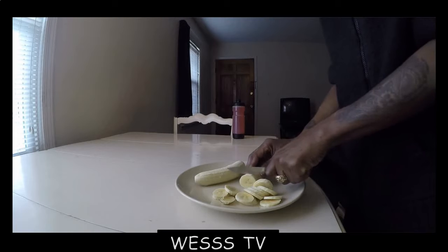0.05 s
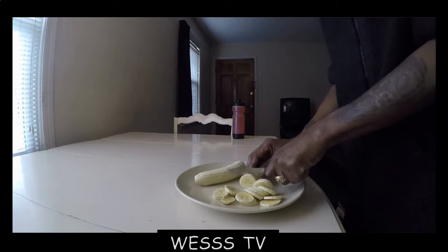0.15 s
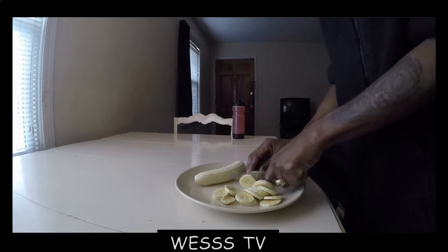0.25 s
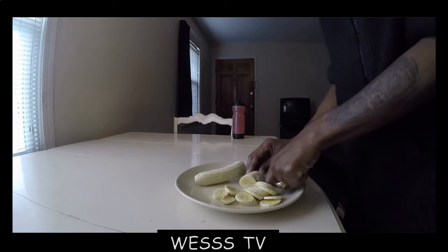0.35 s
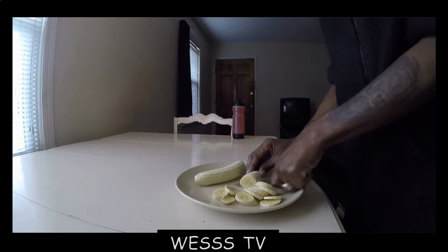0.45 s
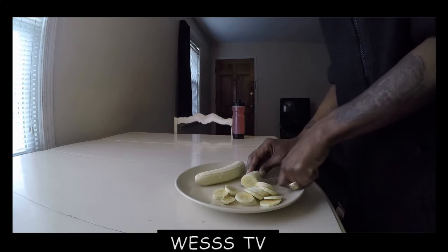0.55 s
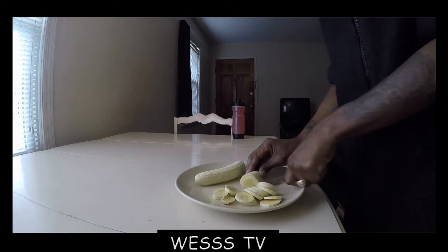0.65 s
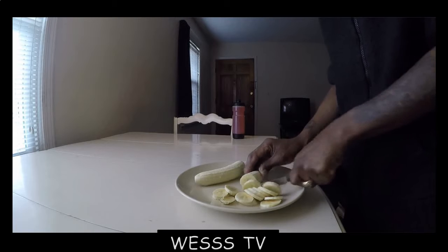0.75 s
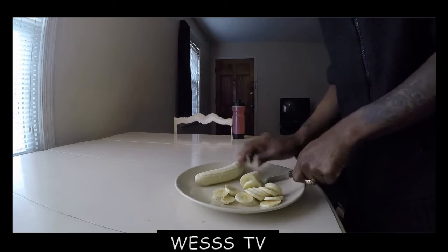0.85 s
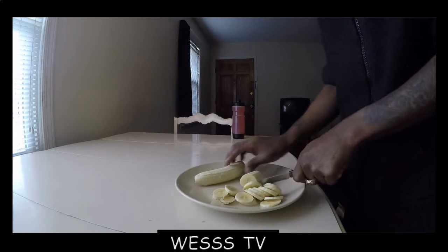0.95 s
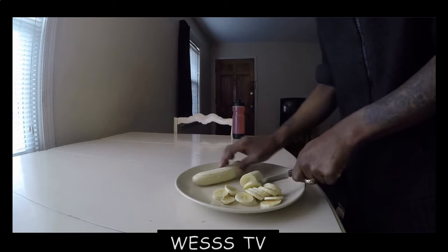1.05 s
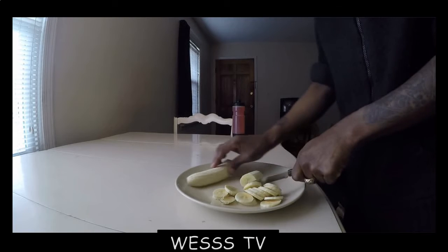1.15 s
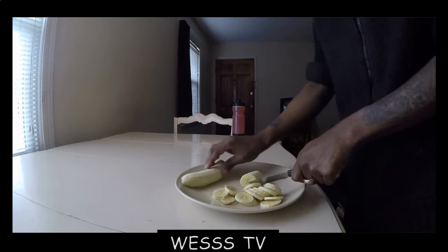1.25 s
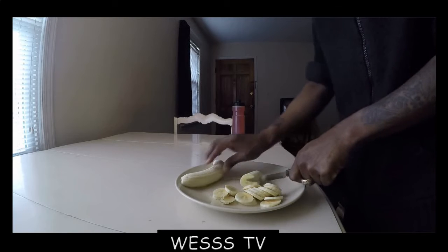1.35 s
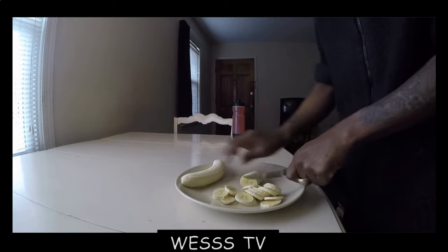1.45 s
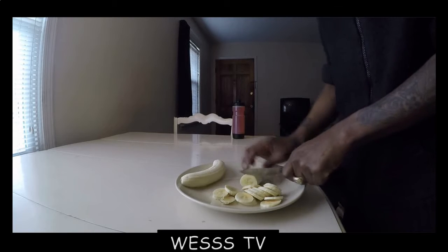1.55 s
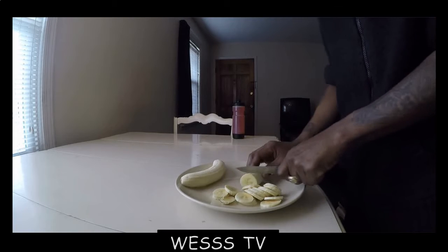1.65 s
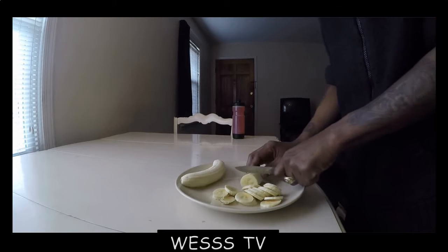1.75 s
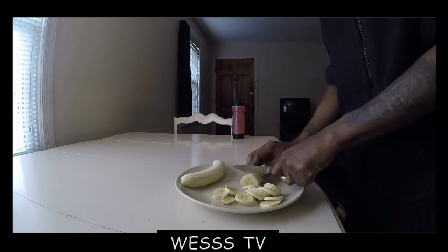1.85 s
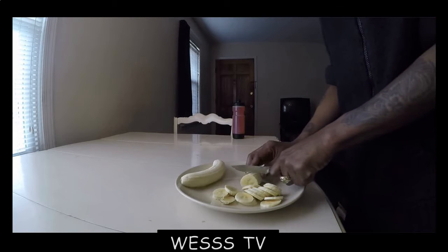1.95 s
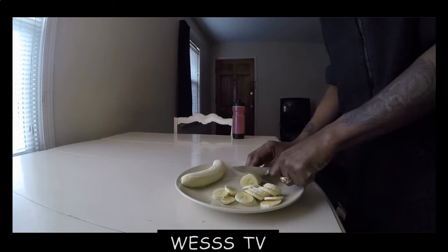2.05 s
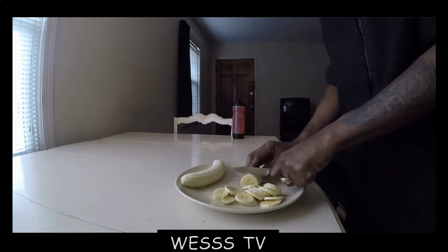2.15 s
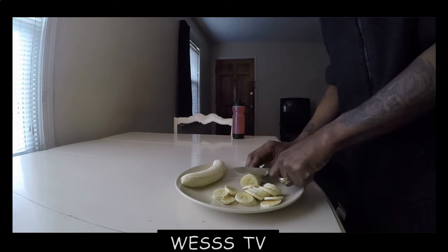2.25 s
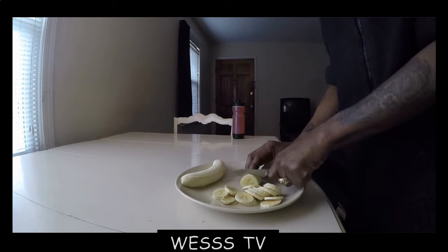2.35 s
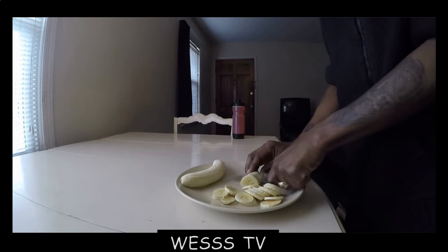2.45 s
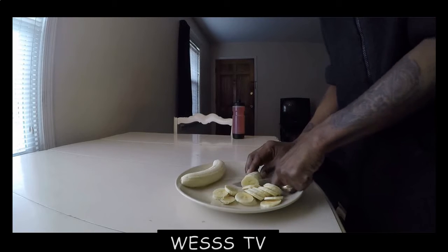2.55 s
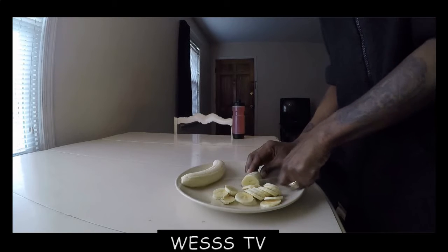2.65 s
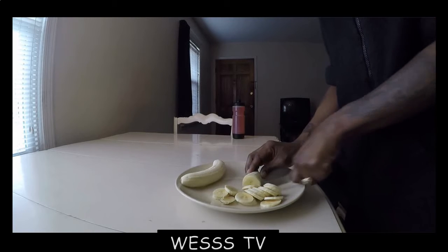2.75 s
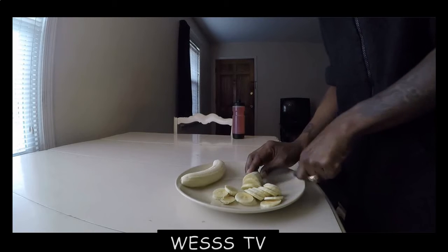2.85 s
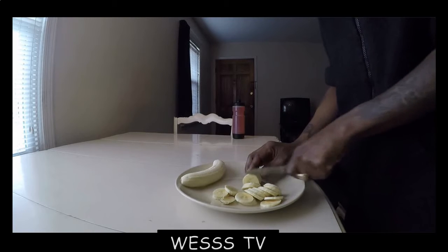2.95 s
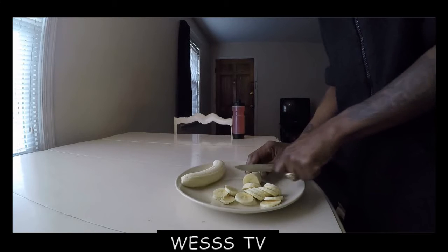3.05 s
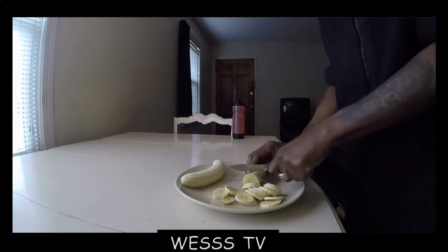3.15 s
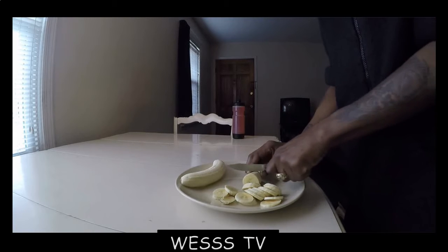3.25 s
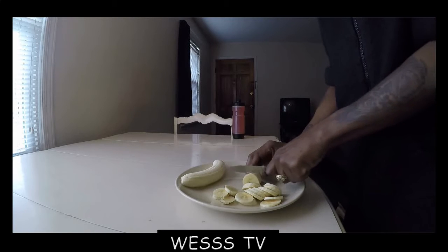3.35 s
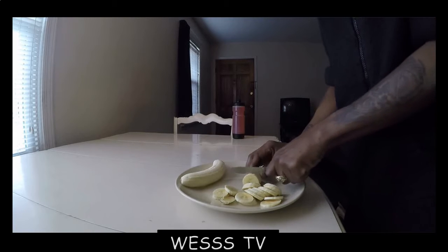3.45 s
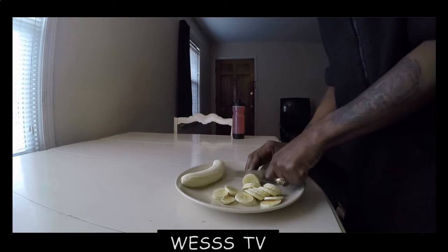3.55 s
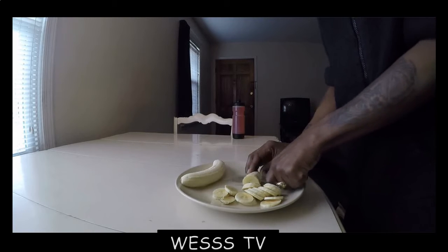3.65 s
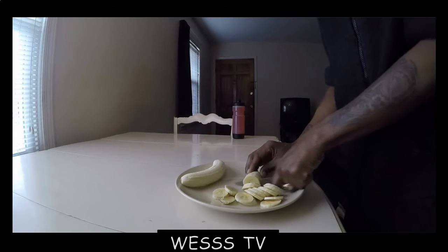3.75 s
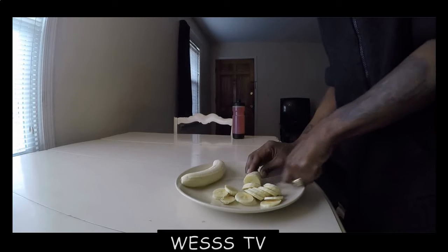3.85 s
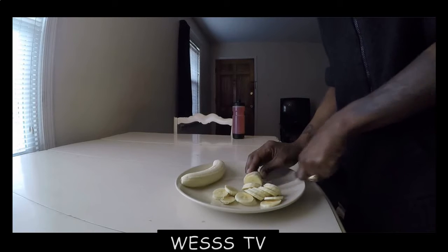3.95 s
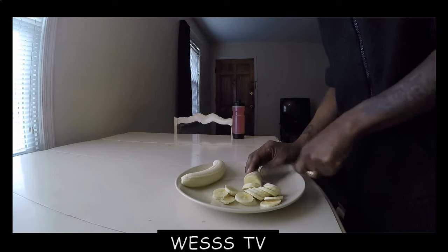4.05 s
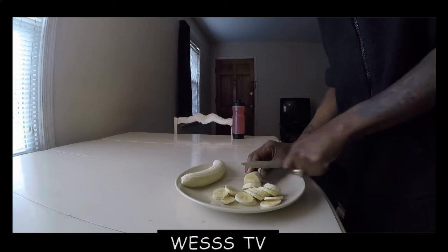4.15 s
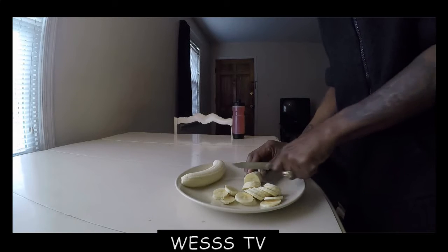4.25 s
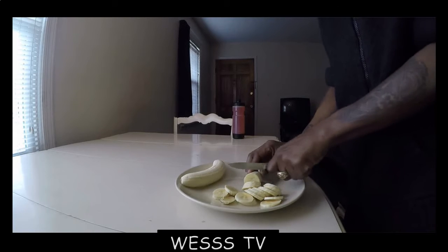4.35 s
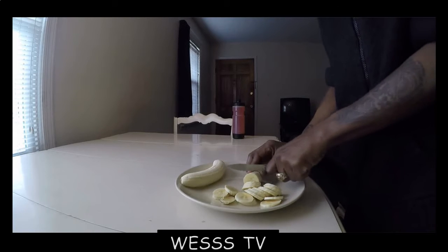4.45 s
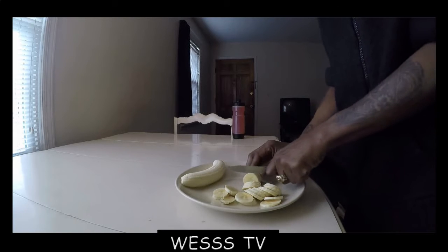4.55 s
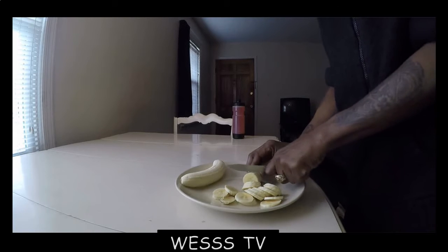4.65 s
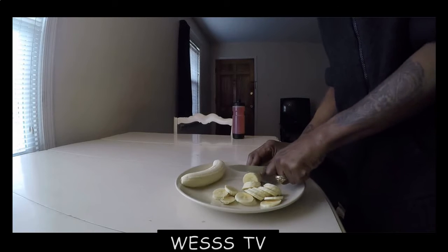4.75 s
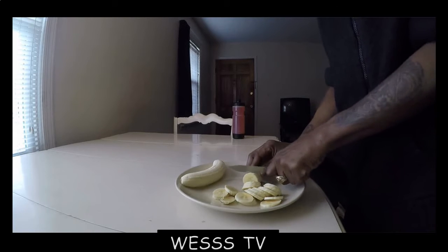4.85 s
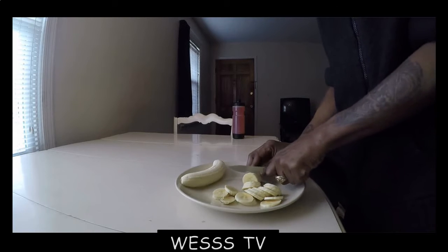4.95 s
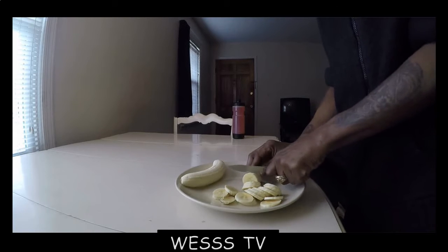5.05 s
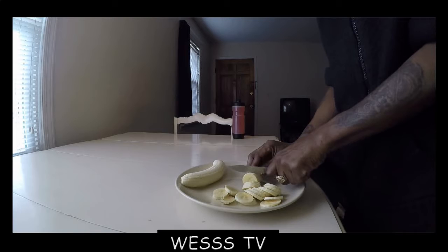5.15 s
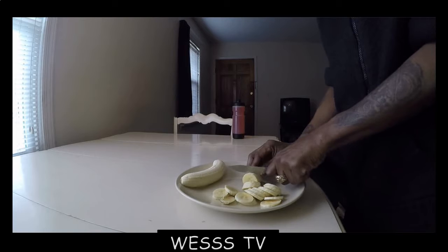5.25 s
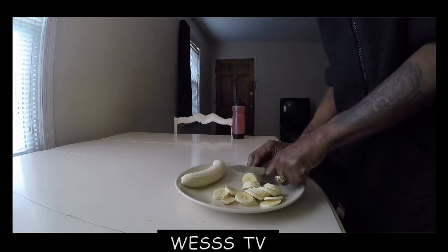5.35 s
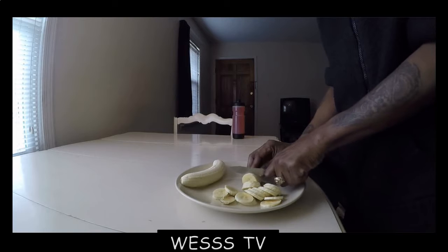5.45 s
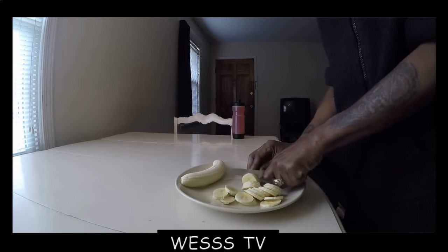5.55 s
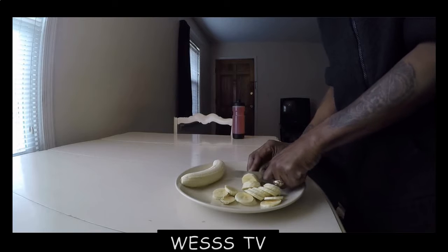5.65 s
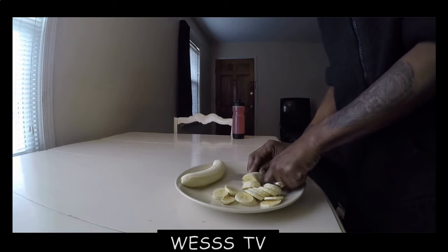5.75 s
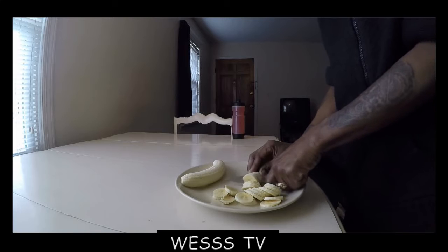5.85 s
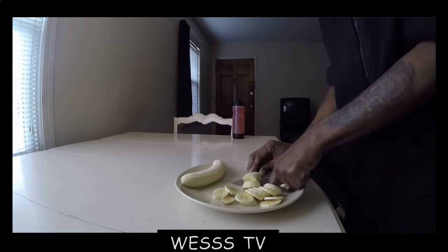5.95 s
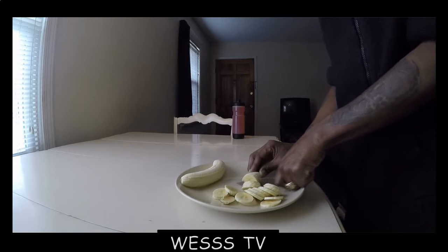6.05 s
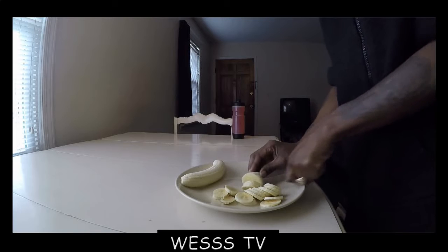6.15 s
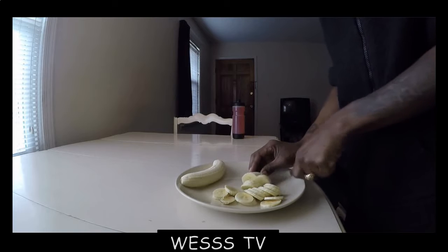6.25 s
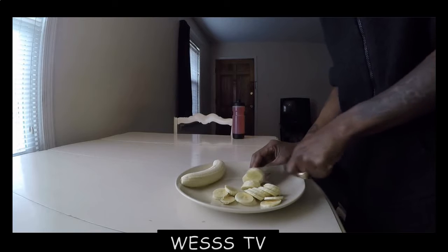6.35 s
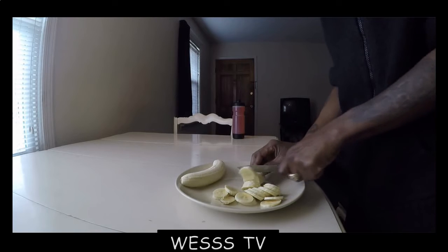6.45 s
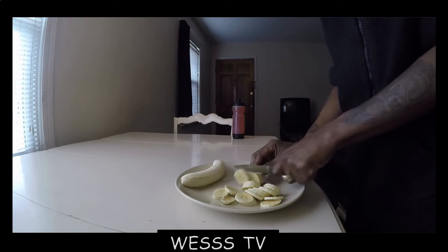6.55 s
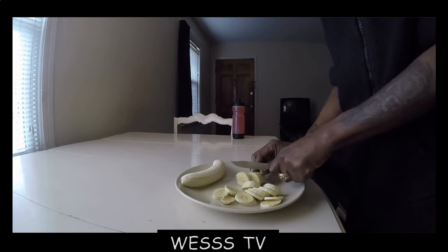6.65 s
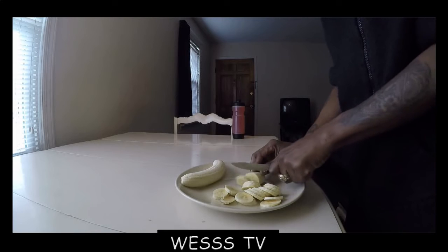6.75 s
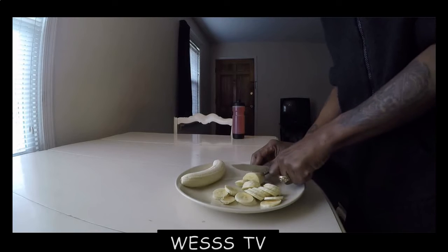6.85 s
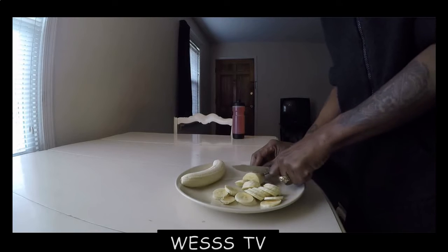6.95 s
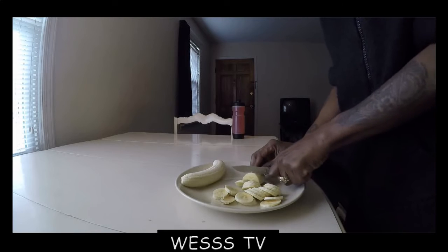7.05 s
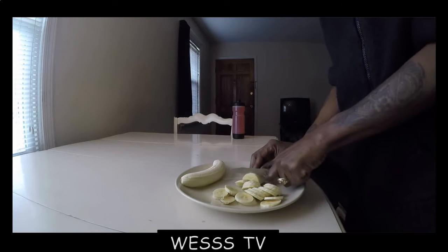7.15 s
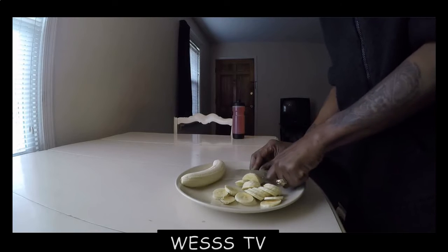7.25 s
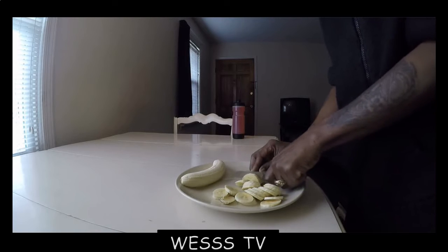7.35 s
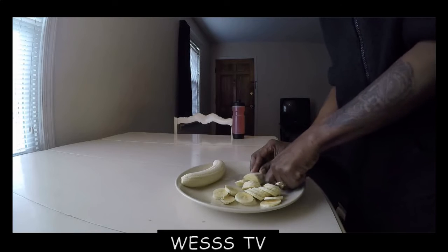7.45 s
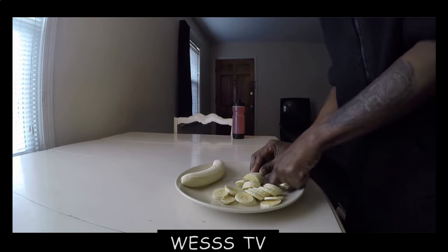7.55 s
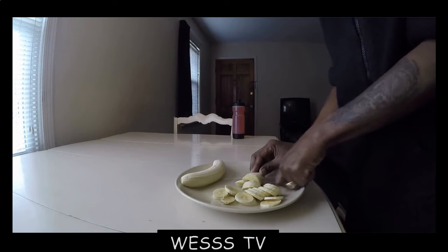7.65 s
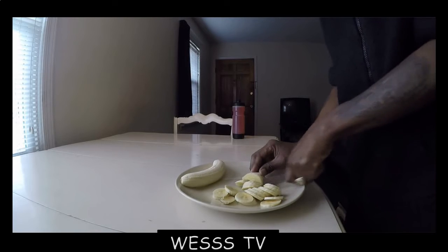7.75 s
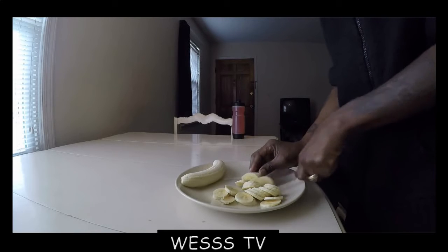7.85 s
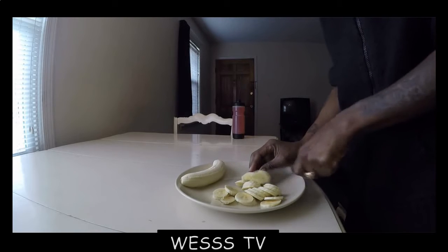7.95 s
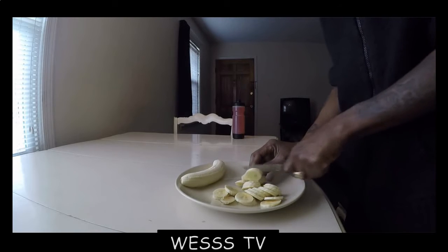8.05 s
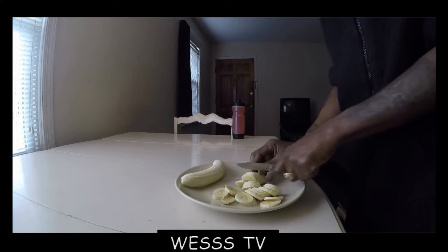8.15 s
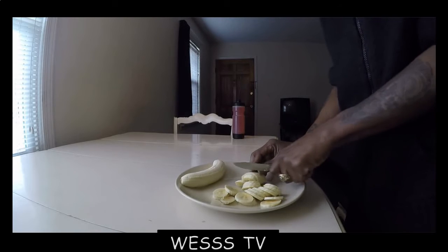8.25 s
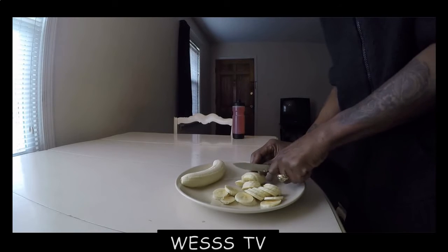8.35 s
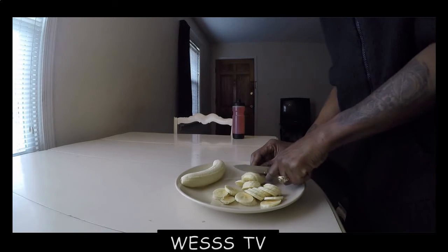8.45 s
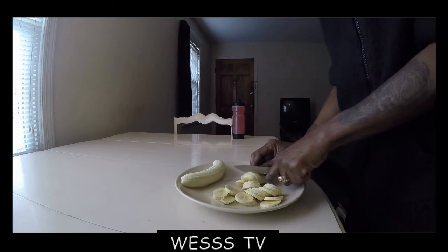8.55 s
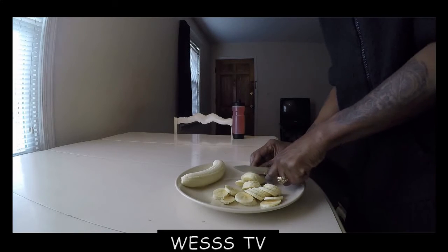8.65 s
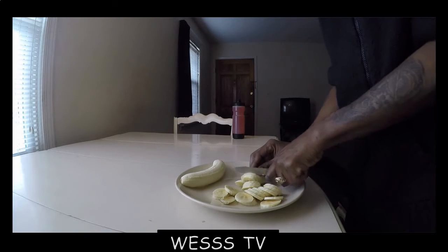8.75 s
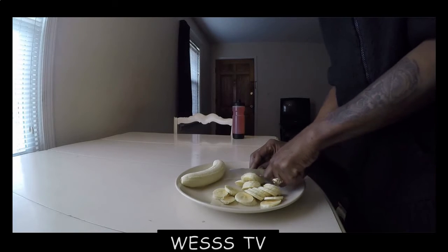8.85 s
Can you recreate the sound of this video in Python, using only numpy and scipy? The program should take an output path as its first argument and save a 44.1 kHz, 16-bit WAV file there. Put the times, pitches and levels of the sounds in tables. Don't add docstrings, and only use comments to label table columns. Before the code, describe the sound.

Five spaced blade-on-plate clacks, each after a faint wet slice, followed by short glassy scrapes and plate rattles, over low room rumble.

```python
import sys
import numpy as np
from scipy import signal
from scipy.fft import rfft, irfft, next_fast_len
from scipy.io import wavfile

SR = 44100
rng = np.random.default_rng(int(sys.argv[2]) if len(sys.argv) > 2 else 0)


def nominal_scale(level):
    x = np.asarray(level, float) / 20
    return 10 ** x


def store_wav(level_fs):
    pcm = np.round(np.clip(np.atleast_2d(level_fs), -1, 1) * 32767)
    wavfile.write(sys.argv[1], SR, pcm.T.astype(np.int16))


N = 392049

# (frequency [Hz], level [dB rms])
HUM = [(33, -51.5), (59.5, -61), (120, -58)]
# (frequency [Hz], level [dB per Hz])
RUMBLE = [(12, -31.5), (20, -2.5), (45, 0), (62, -8.5), (80, -11.5), (100, -17.5), (125, -10.5),
          (185, -19.5), (290, -22.5), (370, -27.5), (450, -31), (700, -43.5), (1000, -73.5)]
# (frequency [Hz], level [dB per Hz])
HISS = [(300, -12), (700, 0), (1500, -4), (2500, -6), (4000, -6), (6000, -9.5), (10000, -15), (14500, -16),
        (16000, -33)]
# (start [s], length [s], from [Hz], to [Hz], level [dB])
CREAKS = [(1.025, 0.16, 1414, 1410, -70), (1.176, 0.38, 340, 333, -61.5), (1.812, .14, 305, 298, -58),
          (1.98, 0.2, 3360, 3220, -73), (2.0, 0.16, 3500, 3460, -75), (3.167, .15, 843, 876, -71),
          (3.153, 0.16, 1370, 1337, -65.5), (3.55, 0.072, 1460, 1475, -68), (4.424, .24, 328, 333, -63.5),
          (4.955, 0.25, 246, 307, -51), (6.454, 0.073, 420, 420, -56.5), (6.632, .13, 4880, 4920, -72.5),
          (7.965, 0.07, 285, 287, -58), (8.162, .11, 1060, 1052, -65)]
# (frequency [Hz], time to fall 60 dB [s])
ROOM = [(200, 0.98), (800, 0.25), (1500, 0.29), (4000, 0.32), (8000, .25), (14000, 0.096)]
# (middle [s], length [s], level [dB])
SLICES = [(0.31, 0.56, -74), (1.29, 0.32, -77), (2.044, 0.23, -81), (2.476, .22, -71), (3.26, 0.32, -80),
          (3.63, 0.22, -70), (5.786, 0.81, -79), (7.47, 0.36, -76.5)]
# (frequency [Hz], level [dB])
FLESH_COLOUR = [(300, -2.5), (1200, 5.0), (4000, -0.5), (9000, -8), (15000, -19.0)]
# (time [s], knock [dB], low thump [dB])
ROCKING = [(0.547, -42.5, -42), (0.598, -42, -43), (.67, -44, -55), (2.639, -56, -61), (2.691, -44, -49),
           (2.744, -40, -51), (3.8, -45, -51), (3.85, -61, -51), (3.928, -51, -49), (5.929, -36, -59),
           (5.98, -40, -36), (6.013, -31, -42), (6.051, -65, -48.5), (6.099, -48, -56),
           (7.628, -27.5, -37.5), (7.66, -47, -64), (7.701, -53, -56), (7.75, -42, -50)]
# (frequency [Hz], level [dB], time to fall 60 dB [s])
TABLE_TOP = [(340, -4, 0.017), (420, 1, 0.021), (471, -4, 0.026), (540, -8.5, 0.056), (695, -2.5, 0.016),
             (754, -1, 0.03785), (781.3, -1.5, 0.036), (995, -3, 0.025)]
# (frequency [Hz], level [dB], time to fall 60 dB [s])
TABLE_FRAME = [(62.2, 2.5, 0.14), (85.96, 2, .15), (124.4, 7, 0.067)]
# (edge bites [s], hold [s], level [dB], extra low ring [dB])
DRAGS = [(0.721, .018, -35.5, 5), (2.563, .008, -51, 7), (2.803, 0.045, -30, 2.5), (3.954, 0.039, -31, 2),
         (6.229, 0.035, -33, 4.5), (7.829, 0.025, -38, 5.5)]
# (time [s], level [dB], extra low ring [dB])
SNAGS = [(3.953, -37, -3), (6.141, -41, -4), (6.195, -47, 1), (7.851, -25, -2), (7.862, -35, 8)]
# (frequency [Hz], level [dB], time to fall 60 dB [s])
GLAZE = [(1287, -9, 0.078), (1390, -5.5, 0.085), (1570, 0, 0.033), (1606, -4.5, 0.053), (1741, -12, 0.028),
         (2391, -11.5, 0.05), (3350, -15, 0.09), (3520, -9.5, 0.0783), (3701, 0, 0.055), (3760, -6, .08),
         (3800, -4.5, 0.064), (4124, -10, 0.055), (4880, -11, .04), (5020, -14, 0.039), (5600, -22, 0.04),
         (6400, -13, 0.021), (8270, -21.5, 0.031), (10290, -29.5, .03)]
# (time [s], peak [dB], flatness of landing [dB], sharpness [dB], loss at rebound [dB])
CUTS = [
    (.488, -7, -17.5, 3.5, 5),
    (2.573, -5, -10, 2, 5.5),
    (3.750, -8.5, -0.5, -3, 4),
    (5.968, -9.5, 7, 3.5, 4.5),
    (7.6, -13.5, 5, 1, 3),
]
# (time [s], peak [dB], low [dB], middle [dB], sharpness [dB])
TOUCHES = [(0.33, -57, -2.5, -4, 7), (.664, -44, -7, 0.5, 0), (2.545, -58, 2, 3, 7.5),
           (2.61, -35, -6.5, 2, -2), (3.711, -51, 1, 1, 6), (5.926, -48, 12, 24, 2.5),
           (7.628, -33, 14, 24, -9), (7.641, -25, -21, 0, -23)]
# (frequency [Hz], level [dB], time to fall 60 dB [s])
CRACK = [(1450, 0, 0.018), (2954, -10, .015), (4145, 3.5, 0.0042), (4940, -20.5, 0.011), (6464, -6, 0.0048),
         (7760, -8.5, 0.006), (9100, -26, 0.002), (9600, -10, 0.0063), (12100, -16, 0.0042),
         (12400, -20, 0.016), (15100, -26, .005)]
PLATE_HZ = [755, 1120, 1291, 1367, 1470, 1562, 1640, 1776, 2008, 2370, 2797, 2937, 3370, 3525, 3680, 3785,
            3905, 4052, 4189, 4600, 4893, 5615, 6132, 6224, 7273, 7950, 9050, 10140, 11350, 12300]
# (level [dB], time to fall 60 dB [s])
PLATE_RING = [(-16, 0.062), (-34, .04), (-9, 0.16), (-4, 0.085), (-3.5, 0.14), (-4.5, 0.11), (-4.5, 0.052),
              (-13, 0.085), (-17.5, 0.22), (-26.5, .12), (-22, .08), (-24, 0.045), (-11, 0.085),
              (-20.5, 0.12), (3.5, 0.043), (-8, 0.13), (-6, 0.11), (-1, 0.0844), (-11, 0.092), (-20, 0.28),
              (-12, 0.12), (-19.5, 0.056), (-14, .12), (-16, 0.11), (-29, 0.1), (-15.5, 0.072),
              (-31, 0.065), (-20, 0.082), (-28, 0.083), (-21, 0.078)]


def rms_one(x):
    return x / np.sqrt(np.mean(x ** 2) + 1e-20)


def at_hz(points, hz):
    points = np.array(points)
    return np.interp(np.log(hz), np.log(points[:, 0]), points[:, 1])


def filtered(x, order, hz, kind="low"):
    return signal.sosfilt(signal.butter(order, hz, kind, fs=SR, output="sos"), x)


def drift(rate):
    step = 40
    r = np.exp(-2 * np.pi * rate * step / SR)
    noise = rng.standard_normal(N // step + 2002)
    slow = rms_one(signal.lfilter([1], [1, -2 * r, r * r], noise)[2000:])
    return np.interp(np.arange(N) / step, np.arange(len(slow)), slow)


def ring(clicks, hz, t60):
    r, w = nominal_scale(-60 / (t60 * SR)), 2 * np.pi * hz / SR
    return signal.lfilter([0, np.sin(w)], [1, -2 * r * np.cos(w), r * r], clicks + 1e-18)


def fade_after(clicks, t60):
    return signal.lfilter([1], [1, -nominal_scale(-60 / (t60 * SR))], clicks + 1e-18)


def coloured(x, spectrum):
    size = next_fast_len(len(x))
    hz = np.maximum(np.arange(size // 2 + 1) * SR / size, 1)
    return irfft(rfft(x, size) * nominal_scale(at_hz(spectrum, hz)), size)[:len(x)]


def clicks_at(seconds, heights):
    out = np.zeros(N)
    out[np.round(seconds * SR).astype(int)] = heights
    return out


def background():
    rumble = nominal_scale(-47.5) * rms_one(coloured(rng.standard_normal(N), RUMBLE))
    hiss = nominal_scale(-67) * rms_one(coloured(rng.standard_normal(N), HISS))
    t = np.arange(N) / SR
    hum = sum(nominal_scale(db - 1.0 + 0.64 * drift(4)) * np.sin(2 * np.pi * hz * t) for hz, db in HUM)
    return rumble + hiss + hum


def creaks():
    waver_db, wobble = 3 * drift(30), 0.0053 * drift(20)
    glide_turn = 2.2
    out = np.zeros(N)
    for start, length, from_hz, to_hz, level_db in CREAKS:
        first, n = int(start * SR), int(length * SR)
        now = slice(first, first + n)
        glide = np.sin(np.linspace(0, glide_turn, n))
        hz = (from_hz + (to_hz - from_hz) * glide) * (1 + wobble[now])
        swell = np.sqrt(np.hanning(n)) * nominal_scale(level_db + waver_db[now])
        out[now] += swell * np.sin(2 * np.pi * np.cumsum(hz) / SR)
    return out


def room(x):
    t = np.arange(SR // 2) / SR
    edges = 100 * 2 ** np.arange(0, 7.4, .5)
    tail = np.zeros(len(t))
    for low, high in zip(edges, edges[1:]):
        band = filtered(rng.standard_normal(len(t)), 2, [low, high], "band")
        tail += band * nominal_scale(-60 * t / at_hz(ROOM, np.sqrt(low * high)))
    tail *= np.clip((t - .003) / 0.006, 0, 1)
    return signal.fftconvolve(x, tail / np.sqrt(np.sum(tail ** 2)))[:N]


def slicing():
    push_s, push_db, push_rise_db = .06, -61, 26.5
    t, strength = np.arange(N) / SR, np.zeros(N)
    for middle, length, db in SLICES:
        strength += nominal_scale(db) * np.cos(np.pi * np.clip((t - middle) / length, -.5, .5))
    for s, *_ in CUTS:
        times = [s - 2 * push_s, s - push_s, s]
        strength += nominal_scale(np.interp(t, times, [-99, push_db - push_rise_db, push_db], -200, -200))
    return strength


def flesh():
    ticks = nominal_scale(3.0 * np.minimum(rng.exponential(1, N), 4)) * rng.standard_normal(N)
    return nominal_scale(5.5) * slicing() * rms_one(coloured(ticks, FLESH_COLOUR))


def knocks():
    delay_s, knock_db, thump_db = 0.0025, -22.5, -35.5
    from_cuts = [(s + delay_s, db + knock_db + flat, db + thump_db + .4 * flat) for s, db, flat, _, _ in CUTS]
    return from_cuts + ROCKING


def table():
    s, knock_db, thump_db = np.transpose(knocks())
    hard_db = -29.5
    upper_db = knock_db + 0.69 * np.minimum(knock_db - hard_db, 0)
    grain = rng.standard_normal(N)
    rattle = grain * fade_after(clicks_at(s, nominal_scale(knock_db - 20)), .07)
    upper = grain * fade_after(clicks_at(s, nominal_scale(upper_db - 20)), .07)
    top = np.zeros(N)
    for k, (hz, db, t60) in enumerate(TABLE_TOP):
        top += (-1) ** k * nominal_scale(db) * ring(rattle if hz < 600 else upper, hz, t60)
    top = filtered(top, 2, [270, 1200], "band")
    push = filtered(clicks_at(s, nominal_scale(thump_db)) + 1e-18, 2, 150)
    return top + sum(nominal_scale(db) * ring(push, hz, t60) for hz, db, t60 in TABLE_FRAME)


def dragging(low):
    creep_s, bite_s, lift_s, trail_s = 0.13, 0.029, 0.015, .05
    shape_db = [-19, -11.5, 0, -4, -28.5, -35.5]
    t, strength = np.arange(N) / SR, np.zeros(N)
    for s, hold, db, low_db in DRAGS:
        times = [-creep_s, -bite_s, 0, hold, hold + lift_s, hold + lift_s + trail_s]
        strength += nominal_scale(db + low * low_db + np.interp(t - s, times, shape_db, -200, -200))
    return strength


def snags(low):
    s, db, low_db = np.transpose(SNAGS)
    return filtered(clicks_at(s, nominal_scale(db + low * low_db)) + 1e-18, 2, 9600)


def drag():
    sizes = nominal_scale(2.5 * np.minimum(rng.exponential(1, N), 4)) * rng.choice([-1, 1], N)
    ticks_per_s = 6000
    grit = nominal_scale(-34) * rms_one(sizes * (rng.random(N) < ticks_per_s / SR))
    rub = [grit * dragging(low) for low in (False, True)]
    catch = [snags(low) for low in (False, True)]
    rings = np.zeros(N)
    for k, (hz, db, t60) in enumerate(GLAZE):
        low = hz < 1900
        choked = nominal_scale(0.5) * ring(catch[low], hz, 0.17 * t60)
        rings += (-1) ** k * nominal_scale(db) * (ring(rub[low] + catch[low], hz, t60) + choked)
    rasp = nominal_scale(11) * filtered(rub[0], 2, [1800, 7000], "band")
    return rings + rasp


def blows():
    rebound_s = .0092
    strikes, rebounds = [], []
    for s, db, flat, sharp, loss_db in CUTS:
        strikes.append((s, db, -2, flat, 4.5 + 0.15 * flat, sharp))
        rebounds.append((s + rebound_s, db - loss_db, 1.5, -2.5 + .4 * flat, -2.2, -1 + sharp))
    touches = [(s, db, low, middle, 0.29 * sharp, sharp) for s, db, low, middle, sharp in TOUCHES]
    return strikes + rebounds + touches


def blow_levels(hz):
    points = np.log([1150, 1250, 1800, 2300, 3000, 3400, 4300, 4800, 6500, 9000])
    levels = []
    for _, peak, low, middle, upper, top in blows():
        bass = low + .3 * middle
        colour = [bass, low, low, middle, middle, 0, 0, upper, upper, top]
        levels.append(peak + np.interp(np.log(hz), points, colour))
    return np.array(levels)


def crack():
    s, chatter = np.array(blows())[:, 0], rng.standard_normal(N)
    out = np.zeros(N)
    for hz, db, t60 in CRACK:
        clicks = clicks_at(s, nominal_scale(blow_levels(hz) + db - 18.5))
        out += ring(chatter * fade_after(clicks, 0.01532), hz, t60)
    return out


def plate():
    hits = blows()
    spread, detune, detune_twin = rng.standard_normal((3, len(hits), len(PLATE_RING)))
    out, t = np.zeros(N), np.arange(SR // 4) / SR
    pressed = (0.23 + 2.14 * np.exp(-t / 0.015)) * (1 - np.exp(-t / 0.0012))
    for k, (hz, (level_db, t60)) in enumerate(zip(PLATE_HZ, PLATE_RING)):
        side = np.sign(np.sin(hz / 640))
        heights = side * nominal_scale(blow_levels(hz) + level_db - 16.5 + 0.98 * spread[:, k])
        envelope = pressed * nominal_scale(-60 * t / min(t60, .25))
        for hit, height, one, other in zip(hits, heights, detune[:, k], detune_twin[:, k]):
            first = round(hit[0] * SR)
            main = np.sin(2 * np.pi * (hz + 5 * one) * t)
            twin = .6 * np.sin(2 * np.pi * (hz + (14 + hz / 300) * other) * t)
            out[first:first + len(t)] += height * envelope * (main + twin)
    return out


def scene():
    struck = filtered(plate() + crack() + drag(), 2, 550, "high")
    struck = filtered(struck, 1, [840, 1230], "stop")
    near = filtered(struck + table(), 4, 13200) + flesh()
    return (near + nominal_scale(-10) * room(near) + creaks() + background())[None]


def band_limit(x):
    return signal.sosfilt(signal.butter(12, 16500, fs=SR, output="sos"), x)


def record(dry):
    rounded = .7 * np.tanh(dry / .7)
    cut = signal.sosfilt(signal.cheby2(10, 60, 16600, fs=SR, output="sos"), rounded)
    return band_limit(cut)


dry = scene()
out = record(dry)
store_wav(out)
```